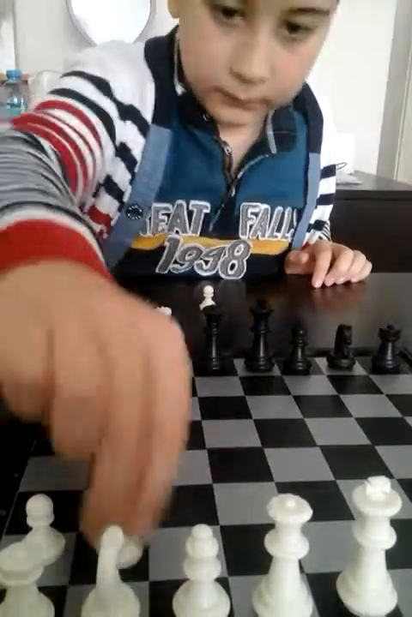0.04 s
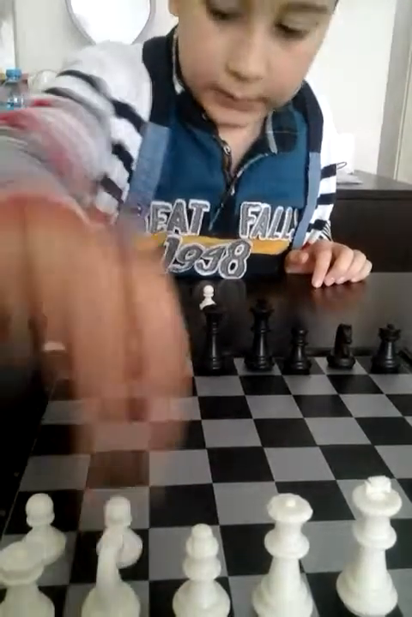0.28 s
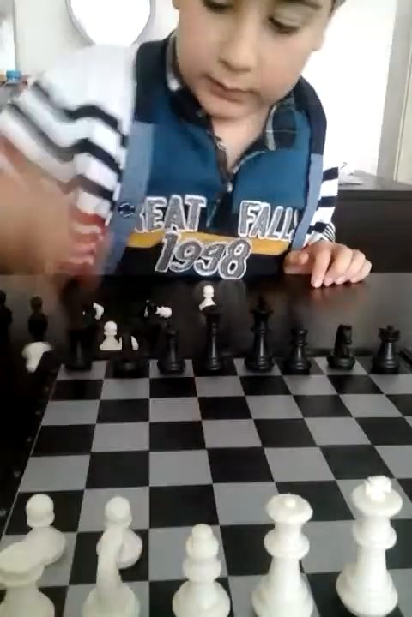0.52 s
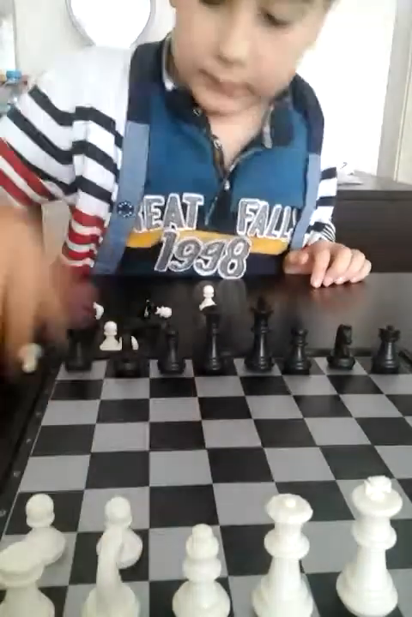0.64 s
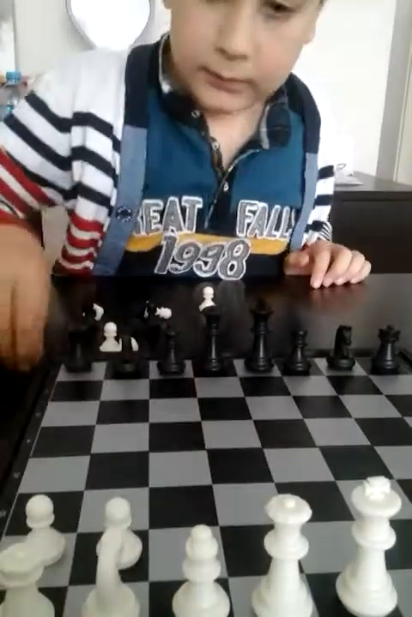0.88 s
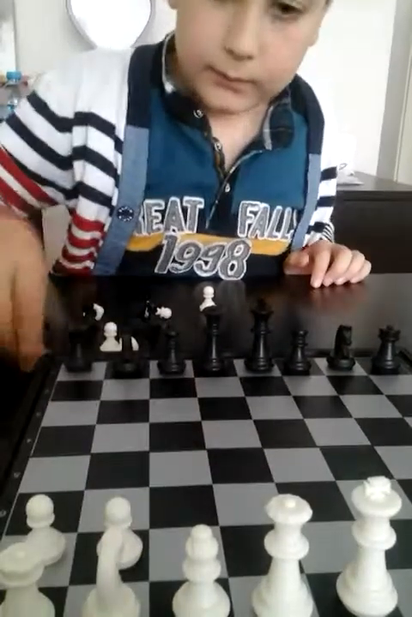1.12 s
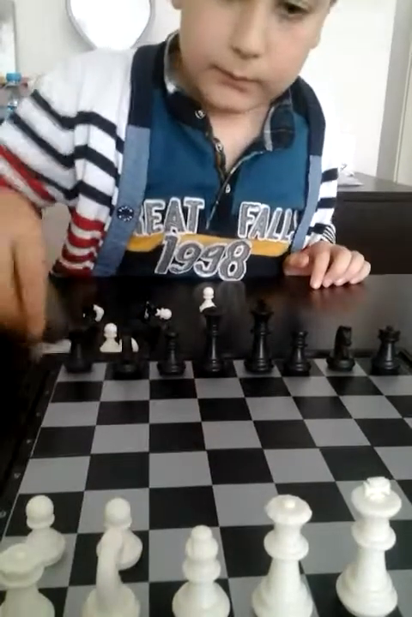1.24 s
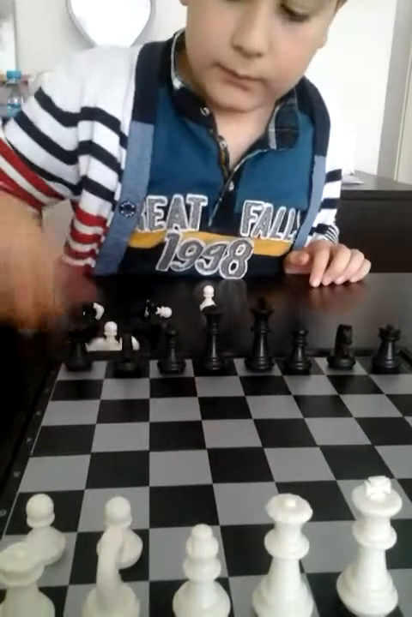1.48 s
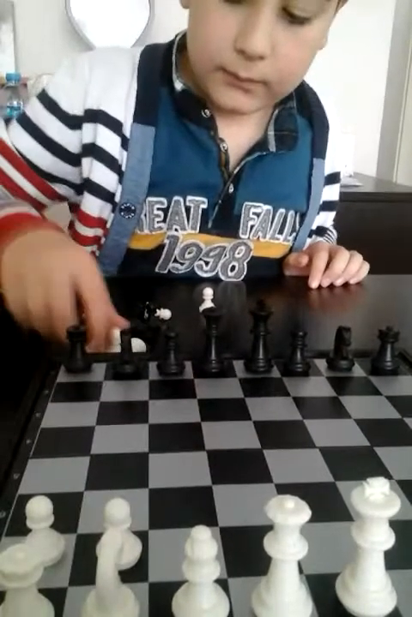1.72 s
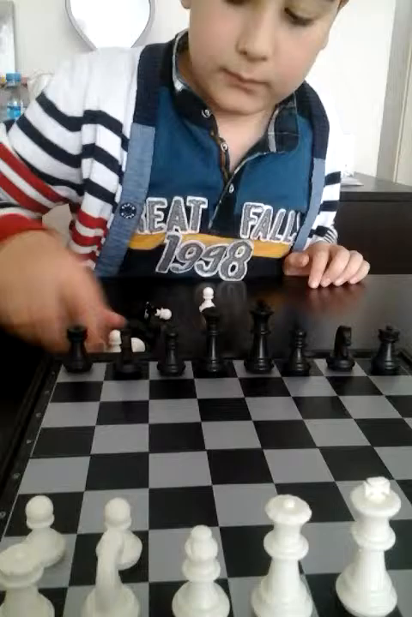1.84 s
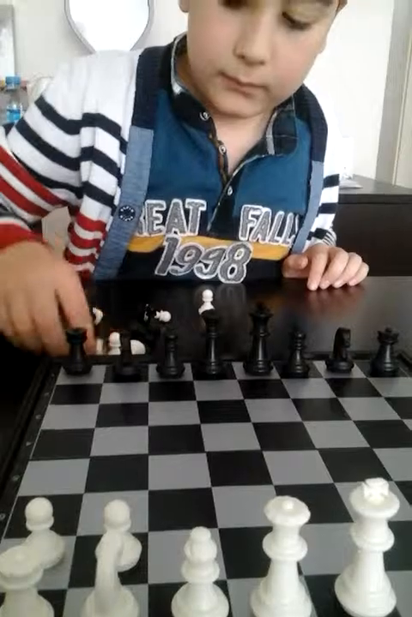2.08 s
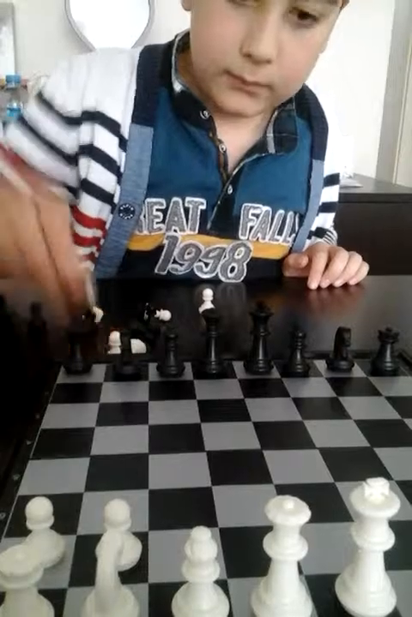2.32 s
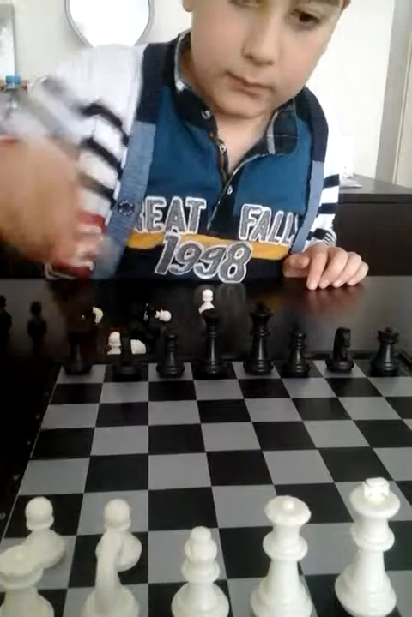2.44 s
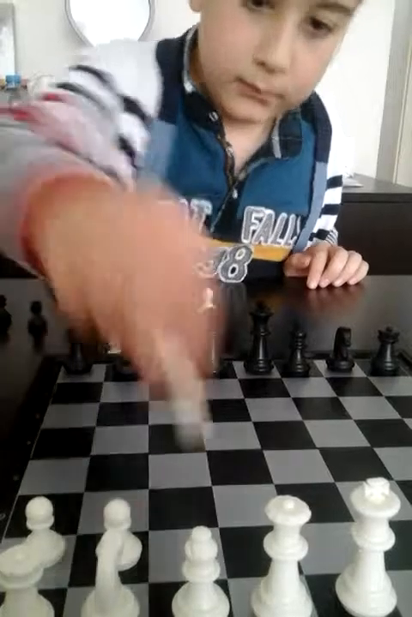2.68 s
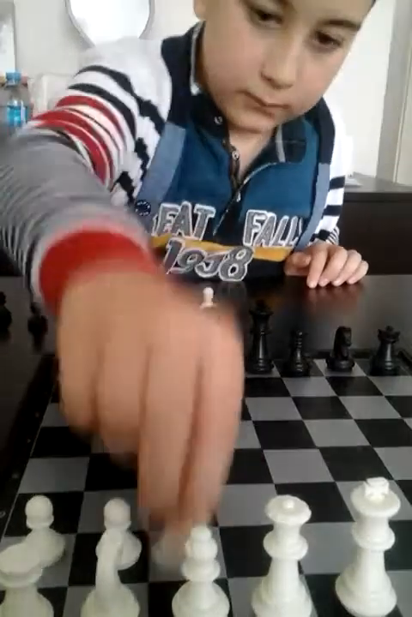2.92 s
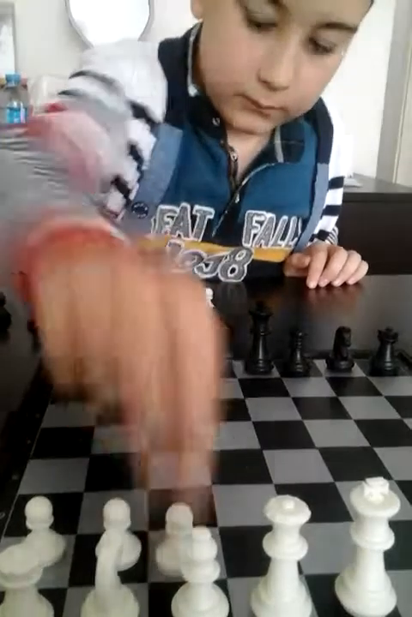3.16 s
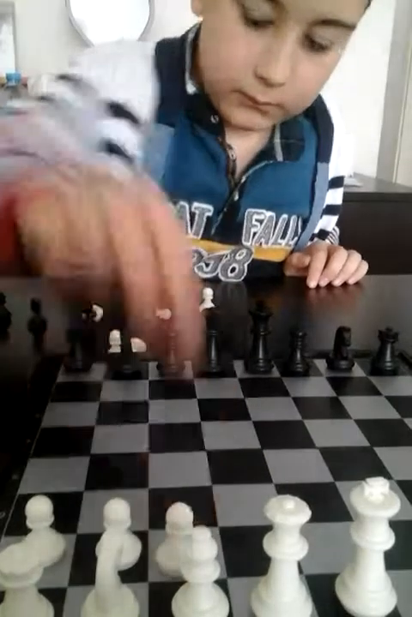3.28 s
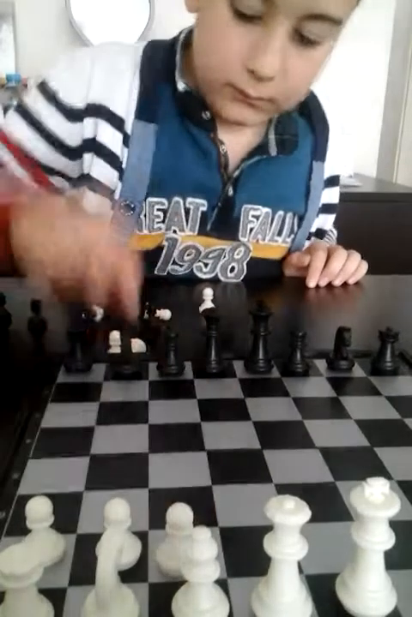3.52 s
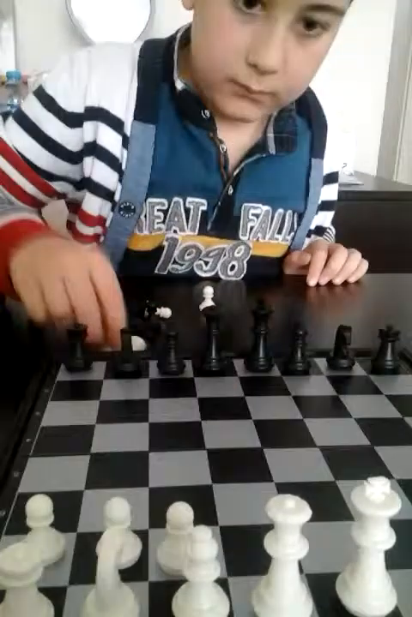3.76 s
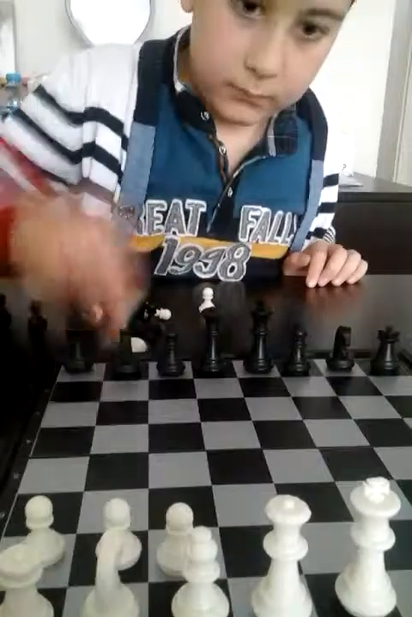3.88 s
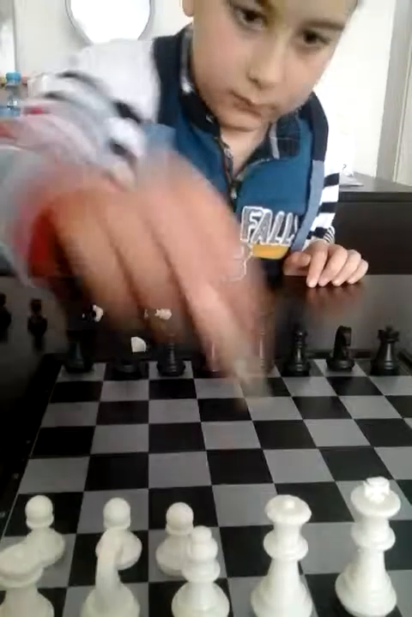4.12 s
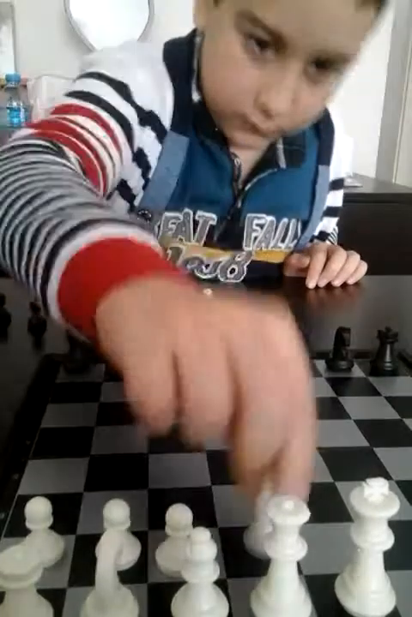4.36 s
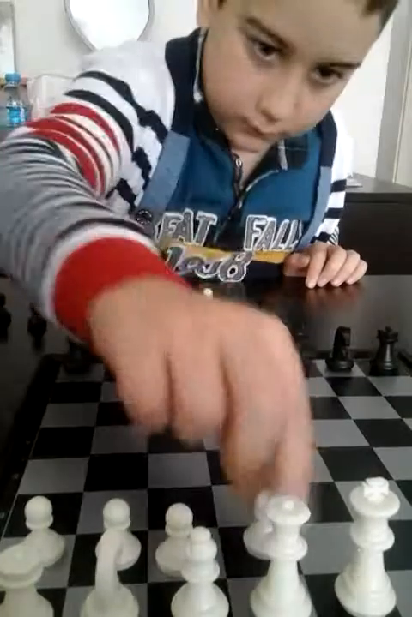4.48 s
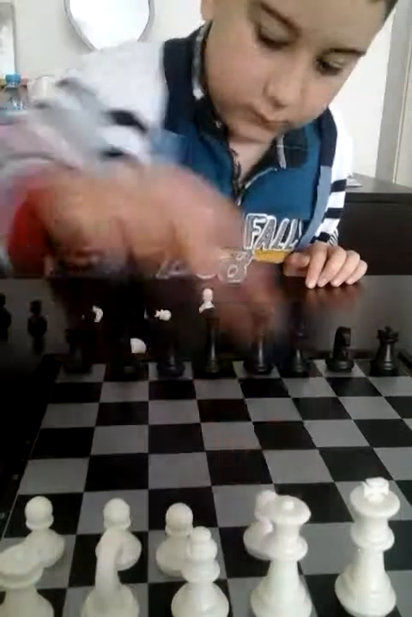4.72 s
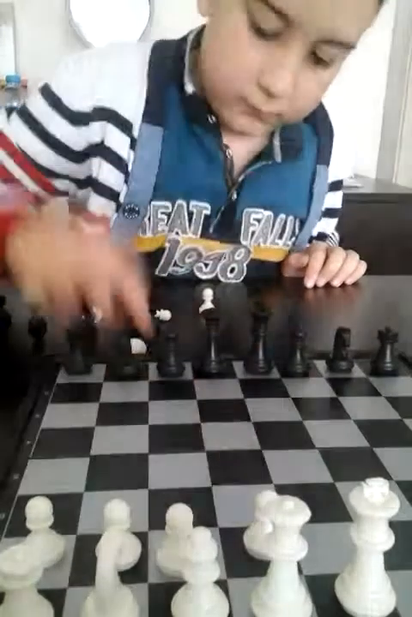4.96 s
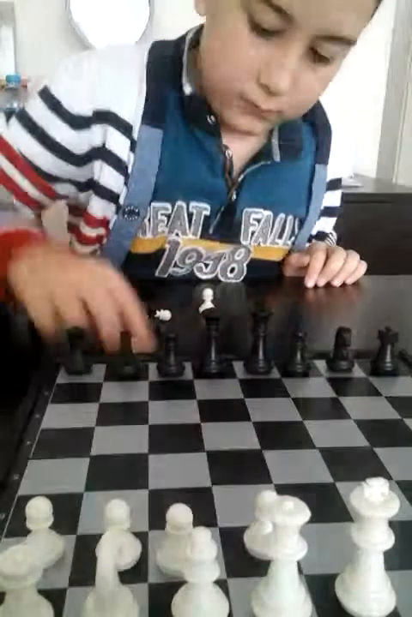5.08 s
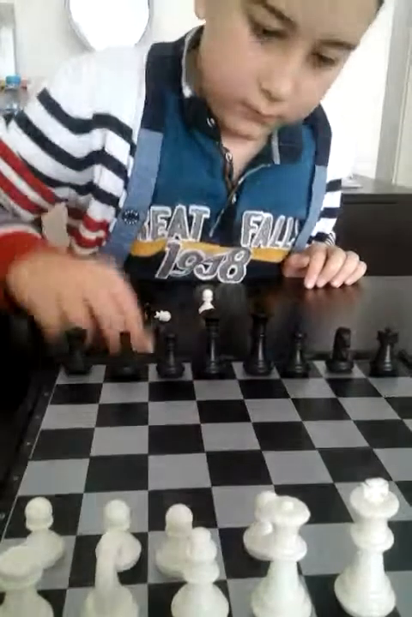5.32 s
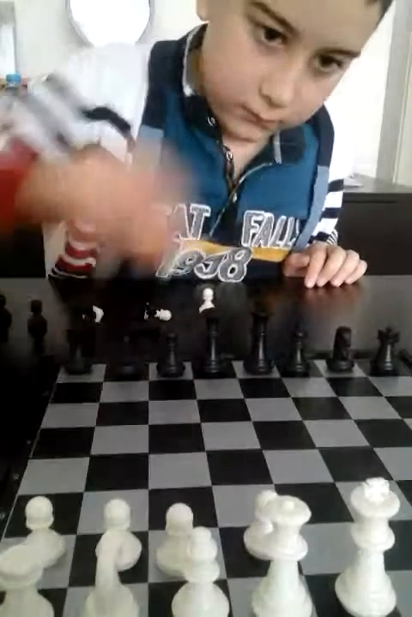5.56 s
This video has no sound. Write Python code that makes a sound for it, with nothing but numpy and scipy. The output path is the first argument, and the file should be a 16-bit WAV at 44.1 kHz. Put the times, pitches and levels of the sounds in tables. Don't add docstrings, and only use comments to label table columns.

```python
import sys
import numpy as np
from scipy import signal
from scipy.fft import rfft, irfft
from scipy.io import wavfile
from scipy.ndimage import uniform_filter1d

SR = 44100
rng = np.random.default_rng(int(sys.argv[2]) if len(sys.argv) > 2 else 0)


def transcribe(signal):
    frames = np.atleast_2d(signal).T
    limited = np.clip(frames, -1, 1)
    pcm = np.round(limited * 32767).astype(np.int16)
    wavfile.write(sys.argv[1], SR, pcm)


def voltage_ratio(level):
    return 10 ** (np.asarray(level, float) / 20)


N = 246871

# centre_hz, width_hz, level_db
PAWN_MODES = [(343, 40, -20.5), (616, 86, -12), (1184, 280, 0), (1219, 150, 2.5), (1395, 190, 2),
              (1769, 120, -3), (2180, 410, -9), (2844, 240, 2), (3643, 290, 3.5), (3520, 210, -13),
              (4650, 300, -17), (5296, 190, -6), (6200, 230, -11.5), (7100, 700, -8.5), (9500, 550, -26),
              (11400, 900, -36)]
# freq_hz, level_db (per Hz)
PAWN_CRACK_COLOUR = [(150, -41), (250, -16.5), (600, -15.5), (900, -13), (1230, -10), (1900, -3),
                     (2800, -8.5), (3700, -5), (5300, -7.5), (6500, -18.5), (7800, -21.5), (8600, -29.5),
                     (14000, -46.5)]


def curve(points, at):
    return np.interp(at, *np.transpose(points))


def colour(x, points, size=4096):
    hz, db = np.transpose(points)
    f = np.fft.rfftfreq(size, 1 / SR)
    log_gain = np.log(voltage_ratio(np.interp(np.log(f + 1), np.log(hz), db)))
    cepstrum = irfft(log_gain, size)
    cepstrum[1:size // 2] *= 2
    cepstrum[size // 2 + 1:] = 0
    response = irfft(np.exp(rfft(cepstrum)), size)
    wet = signal.oaconvolve(np.atleast_2d(x), response[None], axes=1)
    return wet[:, :x.shape[-1]].reshape(x.shape)


def unit(x):
    return x / np.sqrt(np.mean(x ** 2))


def walk(rate):
    k = int(SR / rate)
    held = np.repeat(rng.standard_normal(N // k + 1), k)
    return uniform_filter1d(uniform_filter1d(held, k), k)[:N]


def strikes(when, mode_db, pan_db, hz, width, rise_s, scatter_db, size=1200):
    out = np.zeros((2, N + size))
    t = np.arange(size) / SR
    hz, width = np.broadcast_arrays(hz, width, mode_db)[:2]
    chance = rng.standard_normal((len(when), 5, hz.shape[1], 1))
    onset = 1 - np.exp(-(t / rise_s) ** 2)
    for s, db, pan, f, w, c in zip(when, mode_db, pan_db, hz, width, chance):
        level, detune, phase, side, spread = c
        ring = voltage_ratio(db[:, None] + scatter_db * level) * np.exp(-np.pi * w[:, None] * t) * onset
        turn = 2 * np.pi * f[:, None] * (1 + .012 * detune) * t + 3 * phase
        apart = (f[:, None] / 1500).clip(0, 3) * spread
        left = -voltage_ratio(pan / 2) * np.sum(ring * voltage_ratio(scatter_db * side) * np.sin(turn + apart), axis=0)
        right = voltage_ratio(-pan / 2) * np.sum(ring * np.sin(turn), axis=0)
        start = int(s * SR)
        out[:, start:start + size] += left, right
    return out[:, :N]


def cracks(when, db, low_db, top_db, pan_db, spectrum, rise_s, fall_s, wet_db, own=0.6, size=900):
    out = np.zeros((4, N + size))
    t = np.arange(size) / SR
    shape = (1 - np.exp(-(t / rise_s) ** 2)) * np.exp(-t / fall_s)
    hz, colour_db = np.transpose(spectrum)
    gains = voltage_ratio(db[:, None] + np.outer(pan_db, [0.59, -0.34, 0.096, -0.18]))
    row_gain = voltage_ratio([0, 0, wet_db, wet_db])[:, None]
    for s, gain, low, top in zip(when, gains, low_db, top_db):
        right, other = shape * rng.standard_normal((2, size))
        left = own * np.diff(other, prepend=0) - right
        click = voltage_ratio(wet_db) * np.eye(1, size)[0]
        tilt_db = np.interp(hz, [1500, 2500, 6000, 8000], [low, 0, 0, top])
        tilted = np.transpose([hz, colour_db + tilt_db])
        burst = colour(np.array([left, right, -click, click]), tilted, size=1024)
        burst = burst / burst.std(axis=1, keepdims=True)
        start = int(s * SR)
        out[:, start:start + size] += 0.084 * gain[:, None] * row_gain * burst
    return out[:, :N]


def sent(ring, wet_db):
    return np.vstack([ring, voltage_ratio(wet_db) * ring])


def blows(s, db, low_db, top_db, pan_db, modes, crack, ring_db, crack_db, rise_s, fall_s, wet_db):
    s, db, low_db, top_db, pan_db = np.broadcast_arrays(s, db, low_db, top_db, pan_db)
    hz, width, mode_db = np.transpose(modes)
    each_db = db[:, None] + mode_db + np.outer(low_db, hz < 2000) + np.outer(top_db, hz > 7000)
    ring = strikes(s, each_db + ring_db, pan_db, hz, width, rise_s, 0.88)
    burst = cracks(s, db + crack_db, low_db, top_db, pan_db, crack, rise_s, fall_s, wet_db + 8.0)
    return sent(ring, wet_db - 1.0) + burst


def loose_pawns():
    # start_s, peak_db, flat_landing_db, hard_edge_db
    bounces = [
        (1.291, -8.5, -4, 7),
        (1.309, -2, -1.6, 1.5),
        (1.366, -2, 1.2, -0.5),
        (1.401, -4.5, -9, 7),
        (1.43, -2, -1.5, -4),
        (1.479, -2.5, 0.24, 8.5),
        (1.522, -4, -2.1, -4.5),
        (1.543, -15.5, -4.5, -14),
        (1.563, -8, 0.5, -2),
        (1.597, -5, -4.5, 3.2),
    ]
    # start_s, peak_db
    rocks = [(1.605, -12), (1.62, -19), (1.633, -26), (1.64, -17), (1.661, -16.5), (1.68, -18.5),
             (1.691, -14.5), (1.711, -18), (1.763, -23), (1.799, -23), (1.829, -36)]
    # start_s, peak_db, flat_landing_db
    nudges = [(0.877, -24.5, -2), (0.886, -25, 1), (2.11, -35.5, 0), (2.139, -48, -4), (2.151, -28, -10),
              (2.164, -31, -12), (3.818, -57, 15), (3.843, -47.5, 11.5), (3.889, -42, 3.5), (5.221, -45, 6),
              (5.233, -38, 8.5)]
    rock_flat_db, rock_edge_db, nudge_edge_db = -1, -0.5, 5
    groups = [np.transpose(bounces),
              (*np.transpose(rocks), rock_flat_db, rock_edge_db),
              (*np.transpose(nudges), nudge_edge_db)]
    return sum(blows(*group, pan_db=-0.3, modes=PAWN_MODES, crack=PAWN_CRACK_COLOUR, ring_db=-8.0,
                     crack_db=-6.5, rise_s=0.0008, fall_s=0.0038, wet_db=-4.7) for group in groups)


def set_down():
    # start_s, peak_db, flat_landing_db, hard_edge_db, left_minus_right_db
    landings = [
        (0.111, -19.5, -4.5, -1.5, 1.7),
        (0.797, -35.5, 4, -7, 6.5),
        (1.029, -21.5, -13.5, -13.5, -4),
        (3.02, -26, 3, -1, 9),
        (3.037, -22.5, -5.5, -5, -2),
        (4.474, -25, 3.5, -2.5, -0.5),
    ]
    # centre_hz, width_hz, level_db
    board_modes = [(642, 62, -6.5), (795, 98, -2.5), (992, 130, -3), (1253, 180, 4), (1549, 180, -1.5),
                   (2270, 130, -4.5), (3420, 200, -7), (4100, 280, -2.5), (5730, 520, -0.5),
                   (5946, 1100, -2.5), (7930, 450, -8.5), (11070, 1200, -2.5), (14000, 1000, -25)]
    # freq_hz, level_db (per Hz)
    board_crack = [(180, -46), (520, -21), (1000, 7.5), (2600, -9), (3020, -10.5), (5440, -7.5),
                   (6950, -20.5), (10100, -26.5), (11700, -21), (15000, -41.5)]
    hits = blows(*np.transpose(landings), board_modes, board_crack, ring_db=-4.0, crack_db=0,
                 rise_s=0.00023, fall_s=0.0016, wet_db=-6.8)
    return colour(hits, [(300, -16), (680, 0)])


def rattle(per_s=600, spread_db=1.5):
    # start_s, length_s, level_db, fade_db_per_s
    spells = [
        (0.856, 0.04, -37.5, 28),
        (1.579, 0.28, -27.5, 42.5),
        (2.016, 0.04, -61.5, 10),
        (2.097, 0.075, -40, -5),
        (3.799, 0.18, -52, 80),
        (4.972, 0.06, -62, 50),
        (5.206, 0.044, -46, 39),
    ]
    attack_s, release_s, edge_db = 0.013, 0.035, -24
    hz, width, mode_db = np.transpose(PAWN_MODES)
    dull_db = -2.5 * np.log2(hz / 1200).clip(0)
    out = 0
    for start, length, level_db, fade_db in spells:
        end, end_db = start + length, level_db - fade_db * length
        stop = end + release_s
        rows = [(start, level_db + edge_db), (start + attack_s, level_db),
                (end, end_db), (stop, end_db + edge_db)]
        s = rng.uniform(start, stop, 400)
        s = s[:int(per_s * (stop - start))]
        uneven_db = spread_db * rng.exponential(size=400)[:len(s)].clip(0, 3)
        db = curve(rows, s) + uneven_db - 9
        each_db = db[:, None] + mode_db + dull_db
        ring = strikes(s, each_db, 0 * s, hz, 1.15 * width, 0.00021, 3, size=800)
        out = out + sent(ring, -0.2)
        out = out + cracks(s, db + 2, 0 * s, 0 * s - 6, 0 * s, PAWN_CRACK_COLOUR, .0003, 0.0017, -.5)
    return out


def slide():
    # start_s, level_db, centre_hz
    path = [
        (1.161, -67, 5910),
        (1.226, -47.5, 5740),
        (1.258, -47.5, 6050),
        (1.286, -45, 6200),
    ]
    s, db, hz = np.transpose(path)
    t = np.arange(N) / SR
    grit = rng.standard_normal((2, N)) * voltage_ratio(2 * walk(400))
    core = signal.sosfilt(signal.butter(2, 700, fs=SR, output="sos"), grit)
    core = core * np.cos(2 * np.pi * np.cumsum(np.interp(t, s, hz)) / SR)
    skirt = colour(grit, [(600, -27.5), (1300, 1.5), (2500, -4.0), (4500, 1.0), (7000, -16.5),
                          (8500, -17), (13000, -26.5)])
    level_db = np.interp(t, s, db, left=-120, right=-120)
    return voltage_ratio(level_db) * (unit(core) + voltage_ratio(-6.0) * unit(skirt))


def touch_rings(table, low_width, high_width, rise_s, pan_db):
    s, db, low_hz, high_hz, high_db = np.transpose(table)
    return strikes(s, np.transpose([db, db + high_db]), pan_db + 0 * s, np.transpose([low_hz, high_hz]),
                   np.array([low_width, high_width]), rise_s, 0.17, size=3000)


def pawn_ticks():
    # start_s, peak_db, low_ring_hz, high_ring_hz, high_ring_db
    touches = [
        (0.3338, -29, 2100, 3570, -2),
        (0.3334, -36, 4970, 6600, -12),
        (3.1586, -32, 1830, 5900, -12),
        (3.2005, -27.5, 1570, 6070, -10),
        (4.449, -42, 1215, 4700, -18),
        (4.477, -20.5, 1090, 5300, -26),
        (4.99, -46, 1610, 4560, -23.5),
    ]
    s, db = np.transpose(touches)[:2]
    ring = sent(touch_rings(touches, 260, 400, .0005, 0), -4)
    return ring + cracks(s, db - 19, 0 * s - 9, 0 * s, 0 * s, PAWN_CRACK_COLOUR, .0003, .0015, -4)


def base_snaps():
    # start_s, peak_db, low_ring_hz, high_ring_hz, high_ring_db
    lifts = [
        (0.2091, -30.5, 4650, 11400, -1),
        (0.2705, -33.5, 4870, 8000, 1),
    ]
    return sent(touch_rings(lifts, 1500, 3000, .0001, 5), -9)


def knuckle():
    # start_s, peak_db, low_ring_hz, high_ring_hz, high_ring_db
    knocks = [
        (0.795, -32, 278.2, 610, 2),
        (0.814, -34.5, 282.6, 1056, 1.2),
        (0.839, -41.5, 336, 614, 4),
    ]
    return sent(touch_rings(knocks, 81, 200, 0.00033, -2.0), -0.57)


def sleeve():
    # centre_s, lift_db
    reaches = [
        (.3, 3),
        (.85, 2),
        (1.95, 5),
        (3.25, 3),
        (3.9, 3),
        (4.65, 3),
        (5.05, 3),
    ]
    sleeve_db, reach_s = -70, .15
    cloth = colour(rng.standard_normal((2, N)), [(200, -1), (500, -4.5), (1300, -1.5), (2000, -15.0),
                                                 (5000, -21.5), (12000, -37.5)])
    puffs_db = 7 * walk(45).clip(-1, 1.2)
    t = np.arange(N) / SR
    moving_db = sum(db * np.exp(-((t - s) / reach_s) ** 2) for s, db in reaches)
    return unit(cloth) * voltage_ratio(sleeve_db + moving_db + puffs_db - 1.5)


def room(x):
    # freq_hz, t60_s
    decay = [(250, 0.69), (1000, 0.31), (3000, 0.45), (6000, 0.17), (8000, 0.26), (12000, 0.029)]
    room_db, wall_db = -6, -11
    wall_s, smear_s = .0125, .002
    t = np.arange(int(SR * .6)) / SR
    tail = 0
    for hz in 180 * 2 ** np.arange(0, 6.4, .5):
        edges = [hz / 2 ** .25, hz * 2 ** .25]
        half_octave = signal.butter(2, edges, "bandpass", fs=SR, output="sos")
        band = signal.sosfilt(half_octave, rng.standard_normal((2, len(t))))
        alike = 1 / (1 + (hz / 1800) ** 2)
        band[0] = alike * band[1] + np.sqrt(1 - alike ** 2) * band[0]
        tail = tail + band * voltage_ratio(-60 * t / curve(decay, hz))
    tail = tail * (1 - np.exp(-(t / .006) ** 2))
    tail = voltage_ratio(room_db) * tail / np.sqrt(np.sum(tail ** 2, axis=1, keepdims=True))
    bounce = np.exp(-np.abs(t - wall_s - smear_s) / smear_s) * (t > wall_s)
    echo = rng.standard_normal((2, len(t))) * bounce
    tail += voltage_ratio(wall_db) * echo / np.sqrt(np.sum(echo ** 2, axis=1, keepdims=True))
    return signal.oaconvolve(x, tail, axes=1)[:, :N]


def house():
    # freq_hz, level_db (per Hz)
    spectrum = [(21, -36), (35, -7), (117, -0.5), (243, -7), (511, -15.5), (742, -17.5), (800, -30),
                (894, -14), (1120, -27), (1250, -21), (3000, -34.5), (3900, -54), (6600, -120)]
    rumble_db, air_db = -62, 4.5
    own = colour(rng.standard_normal((2, N)), spectrum)
    shared = colour(rng.standard_normal(N), spectrum)
    shared = colour(shared, [(70, -17.5), (160, -2.5), (500, -6.0), (1400, -13.5)])
    mix = own * voltage_ratio(np.array([[0], [-2.5]])) + voltage_ratio(air_db) * shared * np.array([[-.7], [1.3]])
    return unit(mix) * voltage_ratio(rumble_db + 4 + 2.8 * walk(13))


def scene():
    # freq_hz, level_db
    left_port = [(60, 7.5), (110, -52), (200, -2.5), (380, -6.5), (700, -8.5), (1290, -13.5), (2380, -5),
                 (4400, -7), (8120, 0.5), (15000, 6)]
    left_lag = 6
    sources = loose_pawns() + set_down() + rattle() + sent(slide(), -0.33)
    sources = sources + pawn_ticks() + base_snaps() + knuckle()
    heard = sources[:2] + room(sources[2:]) + sleeve()
    heard = colour(heard, [(60, -40.5), (220, 0)])
    heard[0] = np.roll(colour(heard[0], left_port), left_lag)
    return voltage_ratio(4.5) * heard


def drop_top_bands(x):
    # edge_hz, strain (0-1)
    limits = [(12500, .54), (10600, .7), (8600, .8)]
    busy_db, strain_s, blow_db = -37.3, .2, -19
    power = np.mean(x ** 2, axis=0)
    busy = uniform_filter1d(power, size=3000) > voltage_ratio(busy_db) ** 2
    keep = np.exp(-1 / (strain_s * SR))
    strain = signal.lfilter([1 - keep], [1, -keep], 1. * busy)
    busy = busy & (uniform_filter1d(power, size=400) < voltage_ratio(blow_db) ** 2)
    for edge_hz, limit in limits:
        top = signal.sosfiltfilt(signal.butter(10, edge_hz, "highpass", fs=SR, output="sos"), x)
        x = x - top * uniform_filter1d(1. * (busy & (strain > limit)), size=300)
    return x


def roll_off(x):
    return signal.sosfilt(signal.butter(12, 15850, fs=SR, output="sos"), x)


def record(dry):
    # pitch_hz, level_db
    whine_tone = (11806, -88)
    offset = [
        [-.0012],
        [-.0008],
    ]
    hiss_db = -70 + np.array([[3.5], [5.5]])
    hiss = colour(rng.standard_normal((2, N)), [(500, 6), (3000, 1.5), (7000, 0), (14400, 0), (14700, -50)])
    whine_hz, whine_db = whine_tone
    whine = voltage_ratio(whine_db) * np.sin(2 * np.pi * whine_hz * np.arange(N) / SR) * np.array([[0], [1]])
    loud = np.sqrt(uniform_filter1d(np.mean(dry ** 2, axis=0), size=6000))
    duck = (1 + loud / voltage_ratio(-23)) ** -.45
    background = house() + unit(hiss) * voltage_ratio(hiss_db) + whine
    rounded = 1.2 * np.tanh(dry / 1.2)
    mix = colour(rounded, [(15300, 0), (15900, -50)]) + duck * background + np.array(offset)
    finished = drop_top_bands(mix)
    return roll_off(finished)


dry = scene()
out = record(dry)
transcribe(out)
```